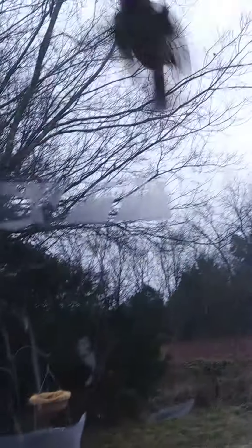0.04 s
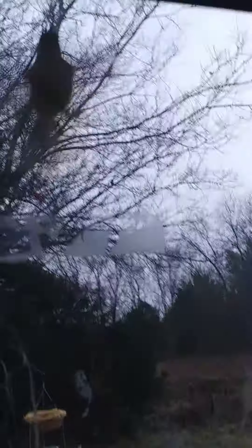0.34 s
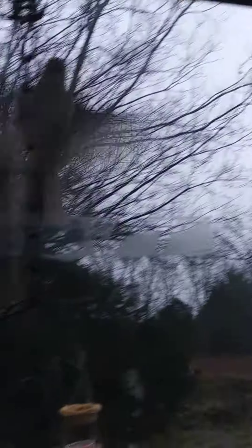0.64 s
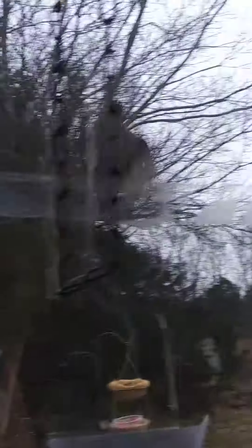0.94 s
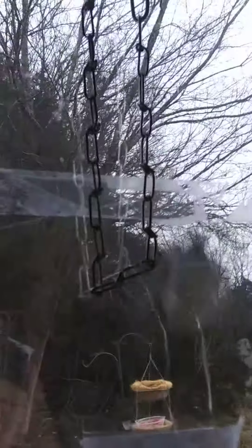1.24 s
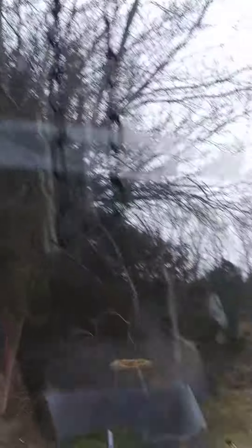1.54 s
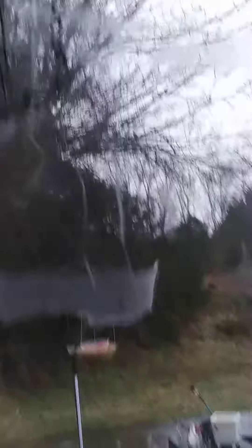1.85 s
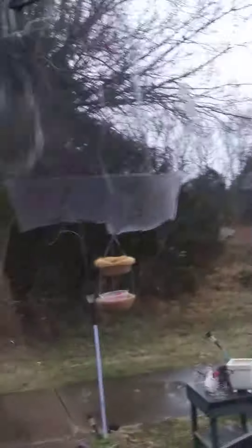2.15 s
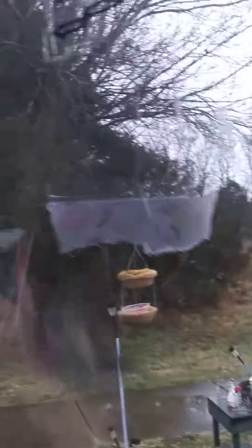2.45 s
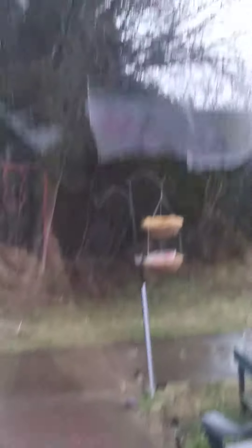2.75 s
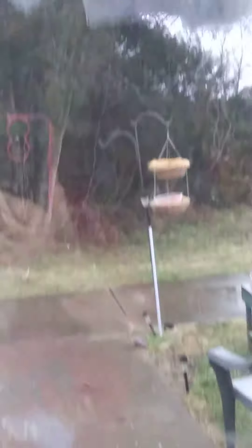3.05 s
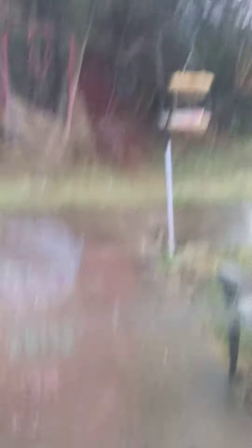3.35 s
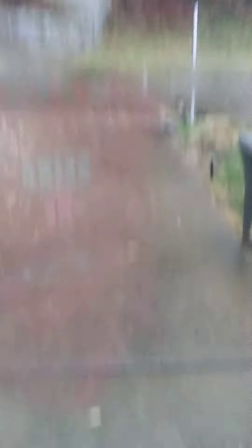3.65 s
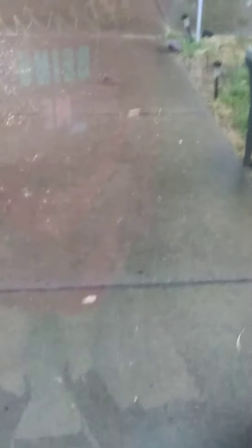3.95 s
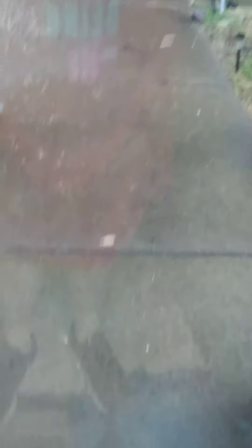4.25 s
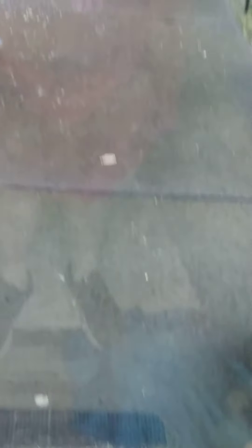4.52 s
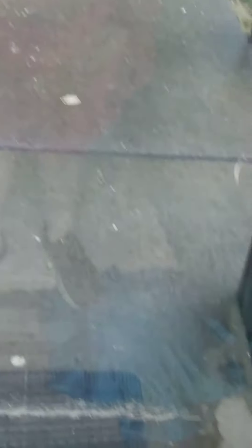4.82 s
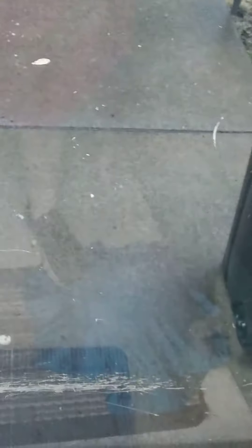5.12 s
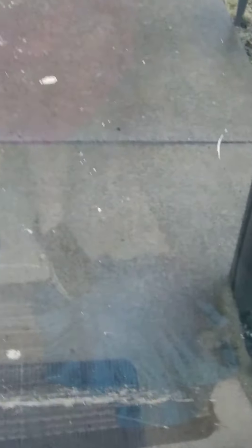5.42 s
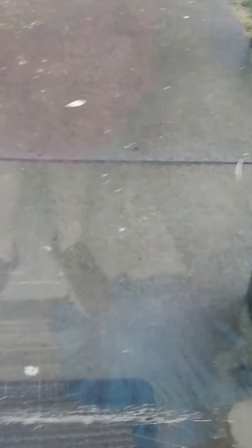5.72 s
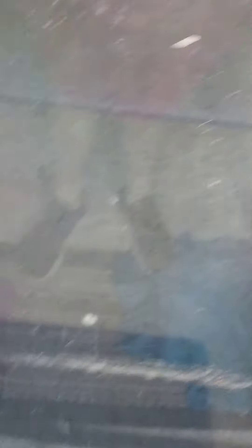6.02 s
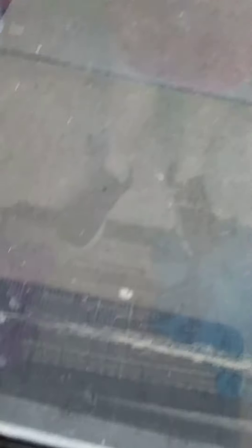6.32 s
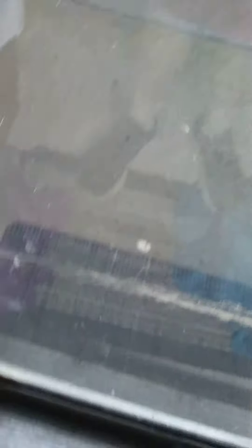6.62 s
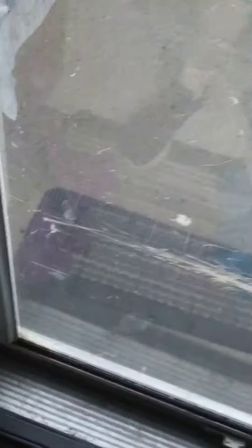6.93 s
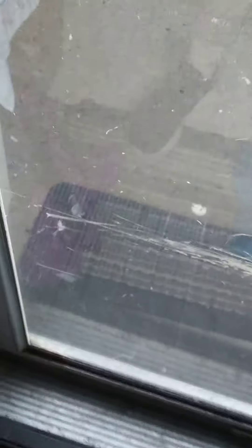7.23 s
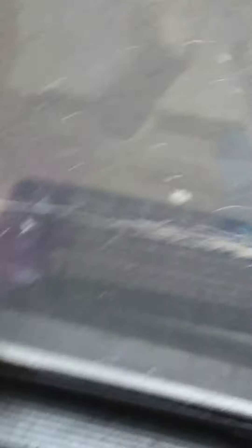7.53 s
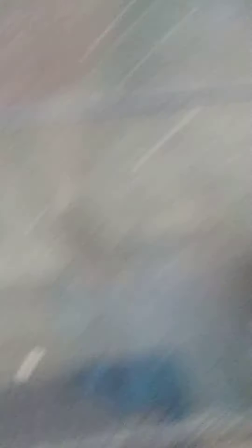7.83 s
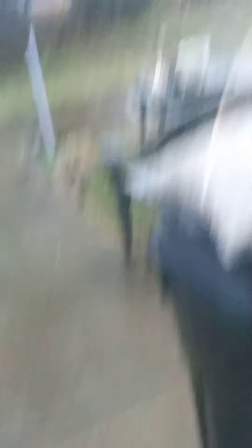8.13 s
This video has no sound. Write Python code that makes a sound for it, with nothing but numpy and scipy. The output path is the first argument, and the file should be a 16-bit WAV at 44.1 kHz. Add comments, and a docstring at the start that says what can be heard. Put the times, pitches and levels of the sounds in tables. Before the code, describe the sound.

Wings brush and knock on a glass pane as a small bird squeaks and whistles, over soft outdoor noise and distant chirping.

```python
"""Under a porch, a small bird flutters against a glass door. Its wing tips brush the pane with
friction noise, and blows of beak and body excite the modes of the glass. It gives low rising
whistles, hoarse squawks and thin, swooping squeaks, all frequency-modulated tones, which
reflect from the roof and walls. Other birds twitter far off over a soft wash of outdoor noise."""
import sys
import numpy as np
from scipy import signal
from scipy.fft import rfft, irfft, next_fast_len
from scipy.io import wavfile

SR = 44100
rng = np.random.default_rng(int(sys.argv[2]) if len(sys.argv) > 2 else 0)


def materialize(psi):
    """Save the field psi as 16-bit PCM at rate SR to the path in sys.argv[1].

    A 1-D psi becomes a single channel; in a 2-D psi each row is a channel.
    """
    bounded = np.clip(np.atleast_2d(psi).T, -1, 1)
    quanta = np.round(bounded * 32767).astype(np.int16)
    wavfile.write(sys.argv[1], SR, quanta)


N = 364707
TIME = np.arange(N) / SR


def amp(db):
    """Amplitude ratio of a level in decibels."""
    return 10 ** (np.asarray(db) / 20)


def unit(x):
    """Normalisation to rms 1."""
    return x / np.sqrt(np.mean(x ** 2) + 1e-20)


def read(points, hz):
    """Interpolation of (f/Hz, value) points on a logarithmic frequency axis."""
    f, value = np.transpose(points)
    return np.interp(np.log(hz + 1), np.log(f + 1), value)


def add(mix, s, sound):
    """Superposition of a sound on the mix, starting at s seconds."""
    at = round(s * SR)
    sound = sound[max(-at, 0):]
    part = mix[max(at, 0):][:len(sound)]
    part += sound[:len(part)]


def colour(x, gain_db):
    """Minimum-phase filter: the phase follows from the log gain by a Hilbert transform."""
    size = 2 * next_fast_len(len(x) // 2 + 2048)
    log_gain = np.log(amp(gain_db(abs(np.fft.fftfreq(size, 1 / SR)))))
    response = np.exp(np.conj(signal.hilbert(log_gain)))
    return irfft(rfft(x, size) * response[:size // 2 + 1])[:len(x)]


def resonance(hz, centre_hz, width_hz):
    """Lorentzian peak of height 1."""
    return 1 / (1 + (2 * (hz - centre_hz) / width_hz) ** 2)


def wobble(size, rate_hz):
    """Random modulator: low-pass noise of rms 1."""
    hz = np.fft.rfftfreq(size, 1 / SR)
    return unit(irfft(rfft(rng.standard_normal(size)) / (1 + (hz / rate_hz) ** 4), size))


def die_away(x, t60s):
    """Frequency-dependent damping: each band falls 60 dB in its own T60."""
    hz, t, bands = signal.stft(x, SR, nperseg=128)
    decay = amp(-60 * t / read(t60s, hz)[:, None])
    return signal.istft(bands * decay, SR, nperseg=128)[1][:len(x)]


def arch(t, length):
    """Amplitude envelope: a broadened half sine from 0 to length."""
    return np.sin(np.pi * np.clip(t / length, 0, 1)).clip(0) ** 0.79


def phase_of(hz):
    """Phase as the time integral of instantaneous frequency."""
    return 2 * np.pi * np.cumsum(hz) / SR


def glides(rows, overtone_db, spread=0.18):
    """Linear sweeps of three harmonics; fast random frequency modulation makes them rough."""
    out, t = np.zeros(N), np.arange(SR // 6) / SR
    for s, length, start_hz, end_hz, db, rough in rows:
        sweep_hz = np.interp(t, [0, length], [start_hz, end_hz])
        phase = phase_of(sweep_hz * (1 + spread * rough * wobble(len(t), 660)))
        voice = sum(amp(k * overtone_db) * np.sin((k + 1) * phase) for k in range(3))
        add(out, s, amp(db) * arch(t, length) * voice)
    return out


# Spectral density of the outdoor noise: f/Hz, level/dB
WASH_SPECTRUM = [(24, -49), (40, -32.5), (100, -20.5), (150, -11.5), (200, -11.5), (275, -5), (382, -4.5),
                 (632, -8.5), (839, -7.5), (1270, -9), (1620, -8.5), (2110, -8.5), (2300, -11),
                 (3480, -16.5), (4430, -22.5), (5280, -22.5), (7500, -33), (9750, -70.5), (16500, -120)]
# Hollow resonances of the porch: f/Hz, width/Hz, gain/dB
PORCH_RESONANCES = [(296.5, 50, 2.5), (443.4, 140, 3), (867, 210, 3), (1497, 140, -0.5), (1915, 110, 1),
                    (2287, 260, 1.5), (3945, 980, 9.5)]
# Swell of the noise: t/s, low-band level/dB, high-band level/dB
WASH_SWELL = [(0.0, -55.5, -51.5), (0.46, -59, -56), (1.13, -56.5, -57.5), (1.542, -55, -54),
              (2.81, -60, -59), (3.09, -53, -56), (3.31, -60, -60.5), (3.69, -55, -56.5),
              (3.84, -59.5, -63.5), (4.63, -60, -63), (4.8, -55.5, -58.5), (5.02, -53.5, -57.5),
              (5.23, -53.5, -59.5), (5.32, -59, -64.5), (5.88, -62, -67), (6.06, -57, -63.5),
              (6.2, -61.5, -66.5), (6.9, -58.5, -65), (7.37, -60, -61.5), (7.83, -56.5, -58.5),
              (7.95, -58, -60), (8.27, -61, -61.5)]
# Self-noise of the microphone: f/Hz, level/dB
HISS_SPECTRUM = [(4000, 4.5), (6500, 0.5), (8000, -1.5), (10000, 2.5), (16000, 1.5)]
def wash(body_db=-1, top_db=3.5, split_hz=1150, walls_db=-8, drift_db=1.3, hiss_db=-71):
    """Cavity resonance: the porch colours outdoor noise, which swells in two bands over faint hiss."""
    s, low_db, high_db = np.transpose(WASH_SWELL)
    hz = np.fft.rfftfreq(N, 1 / SR)
    hollows_db = sum(db * resonance(hz, f, width) for f, width, db in PORCH_RESONANCES)
    air = rng.standard_normal(N)
    spectrum = rfft(air + amp(walls_db) * early_reflections(air))
    spectrum *= amp(read(WASH_SPECTRUM, hz) + hollows_db)
    low_pass = 1 / (1 + (hz / split_hz) ** 6)
    body = unit(irfft(spectrum * low_pass, N))
    body *= amp(np.interp(TIME, s, low_db) + body_db + drift_db * wobble(N, 10))
    top = unit(irfft(spectrum * (1 - low_pass), N))
    top *= amp(np.interp(TIME, s, high_db) + top_db + drift_db * wobble(N, 9.9))
    hiss = irfft(rfft(rng.standard_normal(N)) * amp(hiss_db + read(HISS_SPECTRUM, hz)), N)
    return body + top + hiss


def swoop(length, fall, start_hz, low_hz, end_hz, curl, fade_db_per_s, db_per_hz,
          trill_hz=115, trill_depth_hz=596, trill_grow_s=0.1, flutter_db=3.0, edge_s=0.0028):
    """Frequency modulation: a note drops, then climbs with a growing trill, weak and raspy when high."""
    t = np.arange(SR // 4) / SR
    held = np.maximum(t - fall, 0)
    drop_hz = (start_hz - low_hz) * np.maximum(1 - t / fall, 0) ** 2
    climb_hz = (end_hz - low_hz) * np.minimum(held / (length - fall), 1) ** curl
    above_hz = drop_hz + climb_hz
    depth_hz = trill_depth_hz * np.minimum(held / trill_grow_s, 1) ** 2
    hz = low_hz + above_hz + depth_hz * np.sin(2 * np.pi * trill_hz * t)
    rasp = np.interp(hz, [7700, 9500], [0.005, 0.03])
    phase = phase_of(hz * (1 + rasp * wobble(len(t), 700)))
    gate = np.clip(np.minimum(t, length - t) / edge_s, 0, 1)
    level = gate * amp(db_per_hz * above_hz + fade_db_per_s * held + flutter_db * wobble(len(t), 200))
    return np.sqrt(2) * level * (np.sin(phase) + amp(-43) * np.sin(2 * phase))


# Squeaks: t/s of the lowest pitch, level/dB of run-up, lead-in, main note and final slide, unused ratio
SQUEAK_CALLS = [(0.041, -42, -27, -13, -30, 1.05), (1.443, -35, -36.5, -22, -36.5, .8),
                (2.961, -35, -39, -27.5, -40, 1.08), (7.545, -44.5, -39.5, -28, -45, 0.95),
                (7.922, -42.5, -43.5, -24.5, -54, .28)]
# Lead-in, main note and final slide: offset t/s, duration/s, fall time/s, start f/Hz, low f/Hz,
# end f/Hz, exponent of the climb, fade/(dB/s), gain above the low pitch/(dB/Hz)
SQUEAK_SWOOPS = [(-.052, 0.031, 0.016, 11200, 7500, 8300, 1, -200, -0.0047),
                 (-.016, 0.027, .015, 7740, 5744, 7300, 3.3, -130, -0.0104),
                 (0.016, 0.16, 0.019, 11600, 7690, 10670, 1.15, -29, -0.0038)]
def squeaks():
    """Frequency sweeps in sequence: a hoarse upward flick, then three swoops, at varying strengths."""
    run_ups = [(s - 0.076, 0.028, 4800, 10460, db, 0.75) for s, db, *_ in SQUEAK_CALLS]
    out = glides(run_ups, overtone_db=-21)
    for s, _, *levels_db, _ in SQUEAK_CALLS:
        for (offset, *shape), db in zip(SQUEAK_SWOOPS, levels_db):
            add(out, s + offset, amp(db) * swoop(*shape))
    return out


# The nearest wingbeats: t/s, level/dB
AIR_PUFFS = [(0.044, -49), (0.17, -54), (0.27, -55)]
def puffs(length_s=0.03, centre_hz=250):
    """Air displacement: a close wingbeat pushes out a soft pulse of low, narrow-band noise."""
    out, t = np.zeros(N), np.arange(SR // 8) / SR
    for s, db in AIR_PUFFS:
        add(out, s, amp(db) * arch(t, length_s) * wobble(len(t), 35) * np.sin(2 * np.pi * centre_hz * t))
    return out


# Modes of the glass door: f/Hz, level/dB, T60/s
PANE_MODES = [(205, -4, 0.55), (240.5, -0.5, 0.3), (419, 3, 0.22), (770, -2.5, 0.21), (1444, -39, 0.027),
              (2160, -29, 0.078), (2210, -5, 0.055), (2350, 2, 0.099), (3730, 4, 0.13), (4040, 14.5, 0.02),
              (4205, 6.5, 0.037), (4520, 5, 0.018)]
def pane_ring(t, spread=0.05):
    """Damped normal modes: the spot that is struck sets each one's strength and shifts it a little."""
    ring = np.zeros(len(t))
    for hz, db, t60 in PANE_MODES:
        shifted_hz = hz * (1 + spread * rng.uniform(-1, 1))
        strength = rng.uniform(0.5, 1.4) * rng.choice([-1, 1])
        ring += strength * amp(db - 60 * t / t60) * np.sin(2 * np.pi * shifted_hz * t)
    return ring


# Flaps that reach the glass: t/s, level/dB, treble gain/dB, lag of the other wing/s (0 if it misses)
WING_FLAPS = [(0.229, -35, -24, 0), (0.299, -28.5, -11, .013), (0.461, -26.5, -14, 0.019),
              (0.6531, -31, -12, 0.013), (0.8292, -29, -14, 0.0074), (0.858, -35, -22, 0.0023),
              (1.0015, -32, -12, 0.011), (1.116, -36, -8, 0), (1.148, -25.5, -17.5, 0),
              (1.176, -34.5, -15, 0), (1.2932, -27, -15.5, 0.018), (1.362, -24.5, -30, 0.0043),
              (1.4065, -23, -24, 0.00032), (1.474, -24, -23.5, 0.0041), (1.522, -28, -17, 0.00094),
              (1.682, -25.5, -24, 0), (1.702, -34.5, -29, 0), (1.7295, -29, -20, 0),
              (1.976, -21.5, -18, 0.0033), (2.0889, -28, -17, 0), (2.19, -28.5, -21, 0.018),
              (2.232, -28, -27, 0.026), (2.301, -22.5, -27.5, 0.014), (2.376, -32.5, -27, 0.00074),
              (2.41, -24, -27, 0), (2.502, -28, -24, 0), (2.531, -25, -19, 0), (2.563, -25.5, -19.5, 0.02),
              (2.595, -29, -21, 0), (2.648, -31.5, -15, 0.0023), (2.697, -38, -13, 0.013),
              (2.724, -34.5, -12, 0.0003), (2.852, -29.5, -15.5, .019), (2.8821, -25.5, -33, 0.0099),
              (2.951, -27, -18, .009), (3.027, -35, -14, 0), (3.4268, -29, -19.5, 0),
              (3.445, -38, -21, 0.026), (3.5564, -28, -26, 0.00082), (3.669, -23, -29, 0.0093),
              (3.697, -32, -14.5, 0.0013), (3.71, -21.5, -31, 0.00068), (3.758, -34, -7, 0),
              (3.797, -40, -14, 0), (7.607, -19.5, -22, 0.0045), (7.8744, -23, -19, 0),
              (7.961, -28.5, -23, 0), (8.0127, -26.5, -13, 0.0038), (8.14, -26.5, -13.5, 0.0019)]
def wing_strokes(other_wing_db=2):
    """Paired contacts: one wing lands, then often the other. Rows of t/s, level/dB, treble gain/dB."""
    first = [(s, db, treble) for s, db, treble, _ in WING_FLAPS]
    second = [(s + lag, db + other_wing_db, treble) for s, db, treble, lag in WING_FLAPS if lag > 0]
    return first + second


# Spectrum of a wing stroke on glass: f/Hz, level/dB
BRUSH_SPECTRUM = [(100, -26.5), (400, -15.5), (1000, -16.5), (1600, -12.5), (2800, -11), (3700, -3),
                  (4700, -7), (5600, -10), (7000, -10), (8300, -15), (10000, -14), (16000, -23.5)]
def wing_brushes(level_db=-7, treble_db=15, touch_s=0.0063, release_s=0.0052, drag_s=0.015,
                 drag_db=-15, spot_db=6, spot_width_hz=900, ring_db=-43):
    """Friction: feather tips land and drag in clumps of tiny clicks, coloured by the spot they touch."""
    out, t = np.zeros(N), np.arange(SR // 8) / SR
    light_touch = signal.butter(3, 3200, "high", fs=SR, output="sos")
    for s, db, scratch_db in wing_strokes():
        length = touch_s * np.exp(0.26 * rng.standard_normal())
        drag = np.exp(-t / drag_s) * unit(np.exp(0.54 * wobble(len(t), 170)))
        contact = np.exp(-np.maximum(t - length, 0) / release_s) + amp(drag_db) * drag
        clicks = contact * unit(rng.standard_normal(len(t)) * np.exp(0.36 * wobble(len(t), 850)))
        tilt = [(4500, 0), (12000, scratch_db + treble_db)]
        spot_hz = rng.uniform(3530, 6770)
        scratch = colour(clicks, lambda hz: read(BRUSH_SPECTRUM, hz) + read(tilt, hz)
                         + spot_db * resonance(hz, spot_hz, spot_width_hz))
        ring = signal.fftconvolve(signal.sosfilt(light_touch, clicks), pane_ring(t))[:len(t)]
        add(out, s, amp(db + level_db) * (1.57 * scratch + amp(ring_db) * ring))
    return out


# Squawks that lead into the calls: t/s, duration/s, start f/Hz, end f/Hz, level/dB, roughness (0-1)
SQUAWK_GLIDES = [(0.553, 0.047, 1550, 1790, -47, 0), (1.33, 0.071, 2487, 3690, -38, 0.9),
                 (2.862, 0.039, 2890, 4140, -39, 0.74), (3.53, 0.031, 1685, 1977, -50, 0.02),
                 (7.452, 0.0274, 2414, 2960, -41, 0.41), (7.822, 0.04, 1802, 2750, -37, 0.53),
                 (8.235, 0.028, 1604, 1685, -49, 0.05)]
def squawks():
    """Strong harmonics and random frequency modulation make short rising calls hoarse."""
    return glides(SQUAWK_GLIDES, overtone_db=-7.5)


# Whistled syllables: t/s, duration/s, start f/Hz, level/dB, time to the peak/s, octave level/dB
WHISTLE_SYLLABLES = [(0.604, 0.067, 2063, -22.5, 0.028, -35), (0.669, 0.12, 2293, -21, 0.037, -32),
                     (0.768, 0.02, 2214, -26.5, 0.008, -31), (0.79, 0.045, 2400, -37, 0, -30),
                     (0.822, 0.061, 2266, -31, 0.0051, -28), (2.127, 0.084, 1977, -26.5, 0.075, -26),
                     (2.21, 0.033, 2296, -22, 0, -31), (2.253, 0.055, 2358, -22, 0.012, -34),
                     (2.362, 0.037, 2270, -33.5, 0.0084, -26), (3.551, 0.055, 2055, -39, 0.018, -6),
                     (3.604, 0.049, 2277, -30, 0.04, -12), (3.651, 0.03, 2340, -27.5, 0.0023, -15),
                     (3.682, 0.025, 2300, -23.5, 0.015, -28), (3.707, 0.032, 2290, -32.5, 0.015, -23)]
def whistles(top_hz=2437, climb_s=0.084, swell_s=0.017, scoop_hz=129, scoop_s=0.0036,
             jolt_s=0.003, jolt_db=-3, sag_hz=50.4, flutter_db=1.5, jitter=0.0068, edge_s=0.0062):
    """Modulated, nearly pure tones: each climbs and swells; wing strokes briefly choke and flatten it."""
    out, t = np.zeros(N), np.arange(SR // 4) / SR
    for s, length, start_hz, db, peak_s, octave_db in WHISTLE_SYLLABLES:
        jolt = np.max([np.exp(-((s + t - at) / jolt_s) ** 2) for at, _, _ in wing_strokes()], axis=0)
        hz = top_hz + (start_hz - top_hz) * np.exp(-t / climb_s) - sag_hz * jolt
        hz -= scoop_hz * np.exp(-t / scoop_s)  # each syllable starts a little flat
        phase = phase_of(hz * (1 + jitter * wobble(len(t), 140)))
        gate = np.clip(np.minimum(t, length - t) / edge_s, 0, 1)
        swell_db = -((t - peak_s) / swell_s) ** 2
        level = amp(db + swell_db + jolt_db * jolt + flutter_db * wobble(len(t), 110))
        octave = amp(octave_db + 5.1 * wobble(len(t), 180))
        add(out, s, gate * level * (np.sin(phase) + octave * np.sin(2 * phase)))
    return out


# Phrases of the farthest birds: start t/s, end t/s, level/dB
TWITTER_PHRASES = [(.86, .93, -56), (2.764, 2.84, -52), (4.18, 4.38, -64), (4.697, 5.08, -62.5),
                   (5.2, 5.48, -67.5), (5.598, 5.7, -60.5), (5.917, 6.05, -61), (6.376, 6.5, -58.5),
                   (6.901, 7.03, -58)]
def twitter(gap_s=0.026, note_s=0.0198, low_hz=3650, high_hz=5650, slur=0.122, spread_db=2.5, rough=0.18):
    """Random frequency sweeps: runs of tiny notes, each slurred up or down."""
    notes = []
    for start, end, db in TWITTER_PHRASES:
        for s in np.arange(start, end, gap_s):
            late, long, high, loud, slope = rng.random(5)
            start_hz = low_hz + high * (high_hz - low_hz)
            end_hz = start_hz * (1 + slur * (2 * slope - 1))
            note_db = db + spread_db * (2 * loud - 1)
            notes.append((s + late * gap_s / 2, note_s * (0.5 + long), start_hz, end_hz, note_db, rough))
    return glides(notes, overtone_db=-38)


# Soft rustles: t/s, duration/s, level/dB
RUSTLES = [(1.099, 0.12, -59), (1.339, 0.22, -49), (2.522, 0.24, -57), (2.86, 0.2, -51),
           (3.045, 0.18, -43.5), (3.646, 0.19, -47.5), (4.71, 0.21, -59.5), (6.347, 0.9, -61.5)]
# Their spectrum: f/Hz, level/dB
RUSTLE_SPECTRUM = [(100, -13), (400, -9.5), (1500, 0), (2800, 3), (3900, 4.5), (5500, -2.5), (7800, -5.5),
                   (9800, -8), (12000, -13.5), (16000, -13.5)]
def feather_rustles(grain=0.21):
    """Sliding friction, mostly of feathers on the glass, gives swells of grainy noise."""
    envelope = sum(amp(db) * arch(TIME - s, length) for s, length, db in RUSTLES)
    grains = rng.standard_normal(N) * np.exp(grain * wobble(N, 400))
    return envelope * unit(colour(grains, lambda hz: read(RUSTLE_SPECTRUM, hz)))


# Beak and body blows: t/s, level/dB, gain/dB of thud, ring, click and opening crack
BLOWS = [(1.639, -30, -12.5, 5, -9, 1.5), (3.2009, -22.5, -16.5, 6, -4, -30),
         (3.7246, -30, -12.5, -2, -21, 0), (7.2955, -29, -20, -5.5, 1, 11),
         (7.6115, -21.5, -14, -0.5, -18, -15), (7.618, -22, -10, 4, -15, -10),
         (7.6794, -15.5, -16, -4, -18, -5), (7.684, -13, -19.5, -5, -24, -13),
         (7.878, -20, -13.5, -2, -37, -8), (8.1444, -23.5, -13, -6, -24, 2)]
# Spectrum of a blow: f/Hz, level/dB
BLOW_SPECTRUM = [(80, -89), (145, -19), (195, -5.5), (450, 6), (1100, -7), (2300, -1), (3100, -9),
                 (3900, -6), (5200, -12), (7500, -22.5), (11000, -20), (16000, -32)]
# Decay of the door's rattle: f/Hz, T60/s
RATTLE_DECAY = [(200, 0.33), (600, 0.24), (2000, 0.12), (4000, 0.13), (9000, 0.055), (16000, 0.082)]
def knocks(level_db=-21, modes_db=-6, rise_s=0.0015, crack_s=0.0049):
    """Impact excitation: a blow rings the pane and rattles the door; the beak is bright, the body dull."""
    out, t = np.zeros(N), np.arange(SR // 4) / SR
    no_boom = signal.butter(3, 140, "high", fs=SR, output="sos")
    for s, db, thud_db, ring_db, click_db, crack_db in BLOWS:
        burst = die_away(rng.standard_normal(len(t)), RATTLE_DECAY)
        rattle = unit(colour(burst, lambda hz: read(BLOW_SPECTRUM, hz)))
        attack = (1 - np.exp(-t / rise_s)) * (1 + amp(crack_db) * np.exp(-t / crack_s))
        blow = signal.sosfilt(no_boom, (rattle + amp(modes_db) * unit(pane_ring(t))) * attack)
        tilt = [(450, thud_db + 5), (1100, 0), (2600, 0.0054), (4000, ring_db + 2), (11000, click_db + 12)]
        add(out, s, amp(db + level_db) * colour(blow, lambda hz: read(tilt, hz)))
    return out


# Clearest chirps of a far song: t/s, duration/s, start f/Hz, end f/Hz, level/dB
FAR_CHIRPS = [(1.807, 0.047, 5010, 5390, -58), (2.598, 0.073, 4066, 4150, -46.5),
              (3.307, 0.049, 4620, 4440, -50), (4.06, 0.043, 5800, 4280, -57),
              (4.128, .035, 3200, 2700, -56), (4.241, .018, 3800, 3150, -49.5),
              (4.265, 0.052, 5100, 3900, -54.5), (4.354, .022, 3900, 3160, -52.5),
              (4.463, 0.017, 5250, 4250, -46), (4.535, 0.021, 3040, 2350, -49.5),
              (4.637, .025, 3630, 3080, -44.5), (4.702, 0.026, 6030, 5500, -58),
              (4.717, 0.031, 5100, 4480, -53.5), (4.765, 0.022, 5100, 4160, -57),
              (4.79, 0.043, 3750, 4230, -55), (4.84, .015, 3450, 3700, -50),
              (4.86, 0.039, 5180, 3900, -54.5), (4.865, 0.021, 3430, 4200, -51),
              (4.897, .02, 3200, 2800, -53), (4.93, 0.029, 3000, 2390, -51.5),
              (5.024, 0.039, 3650, 3310, -48), (5.192, 0.042, 4200, 3400, -52),
              (5.235, 0.029, 3040, 3510, -48), (5.262, 0.025, 5500, 4270, -57),
              (5.265, 0.016, 3620, 3130, -51.5), (5.34, 0.0294, 2960, 2420, -53),
              (5.372, .03, 5740, 5550, -66), (5.39, 0.017, 3330, 3900, -55.5),
              (5.408, .035, 5180, 4900, -60), (5.426, 0.052, 3600, 3150, -50),
              (5.587, .015, 3800, 4960, -56.5), (5.6, .035, 5230, 4160, -53),
              (5.664, 0.037, 3600, 4300, -59), (5.913, 0.046, 5000, 3540, -56),
              (5.956, 0.033, 3500, 4020, -47), (5.988, 0.019, 4130, 3100, -47.5),
              (6.047, 0.035, 3330, 3950, -54.5), (6.068, .022, 4600, 3470, -55)]
# Thin, high far notes: t/s, duration/s, start f/Hz, end f/Hz, level/dB, roughness (0-1)
FAR_THIN_NOTES = [(6.382, 0.097, 8150, 8200, -62.5, 0.03), (6.985, 0.082, 8100, 8200, -62, 0.08)]
def far_birds(chirp_rough=0.14, repeats=4, first_s=4.285, every_s=0.402, first_db=-53.5, step_db=-1.5):
    """Nearly sinusoidal sweeps: a quick song, two thin notes and a rising one, fainter at each repeat."""
    song = [(*chirp, chirp_rough) for chirp in FAR_CHIRPS]
    rising = [(first_s + k * every_s, 0.089, 2240, 2450, first_db + k * step_db, 0.03)
              for k in range(repeats)]
    return glides(song + list(FAR_THIN_NOTES) + rising, overtone_db=-40)


def early_reflections(x, count=8):
    """Specular reflection: the door frame and roof return copies delayed by 2 to 22 ms."""
    taps = np.zeros(SR // 20)
    taps[(SR * rng.uniform(0.002, 0.022, count)).astype(int)] = rng.choice([-1, 1], count)
    return signal.fftconvolve(x, taps / np.sqrt(count))[:N]


# Reverberation time of the porch: f/Hz, T60/s
PORCH_DECAY = [(200, 0.27), (2000, 0.24), (6000, 0.24), (9000, 0.31), (16000, 0.036)]
def porch_reverb(x, density=0.08, delay_s=0.004):
    """Reverberation: sparse echoes from the roof and walls die away band by band."""
    size = SR // 2
    taps = rng.standard_normal(size) * (rng.random(size) < density) * (np.arange(size) > delay_s * SR)
    tail = die_away(taps, PORCH_DECAY)
    return signal.fftconvolve(x, tail / np.linalg.norm(tail))[:N]


def scene():
    """Superposition of direct sound, early reflections, reverberation and the outdoor wash."""
    wings, blows, low_calls = wing_brushes(), knocks(), whistles()
    high_calls, far = squeaks() + squawks(), far_birds()
    send = amp(-15) * (wings + blows) + amp(-18) * low_calls + amp(-13) * high_calls + amp(-6) * far
    send += twitter()  # so distant that only its echo arrives
    direct = wings + puffs() + blows + low_calls + high_calls + far + feather_rustles()
    early = amp(-14) * early_reflections(high_calls + far)
    return (direct + early + porch_reverb(send) + wash())[None]


def record(dry, bass_hz=100, edge_hz=16100):
    """Band limiting: the microphone drops the deep bass, and a steep low-pass ends the treble."""
    thin = signal.sosfilt(signal.butter(3, bass_hz, "high", fs=SR, output="sos"), dry)
    low_pass = signal.firwin(301, edge_hz, window=("kaiser", 9), fs=SR)
    return signal.oaconvolve(thin, low_pass[None], "same")


dry = scene()
out = record(dry)
materialize(out)
```